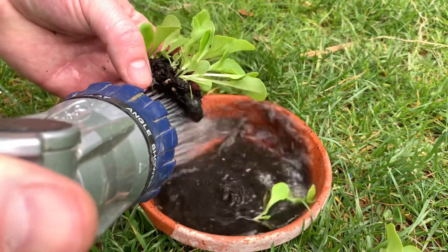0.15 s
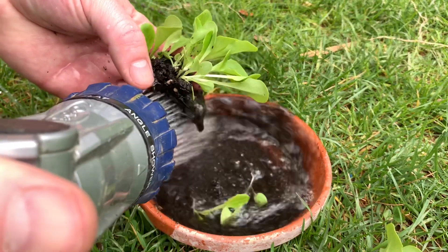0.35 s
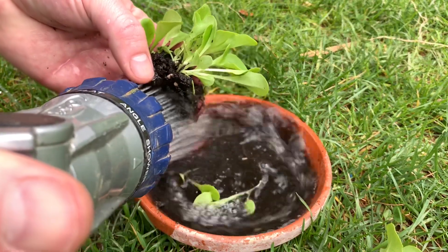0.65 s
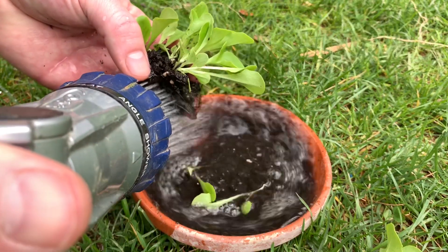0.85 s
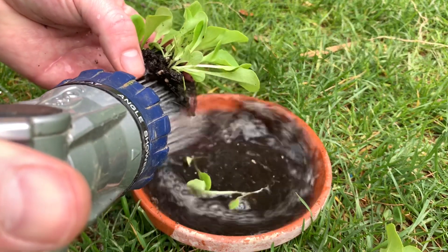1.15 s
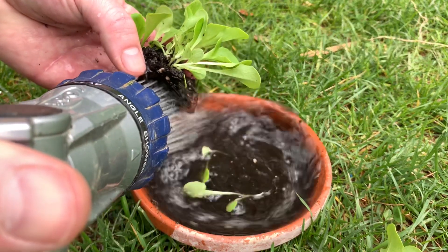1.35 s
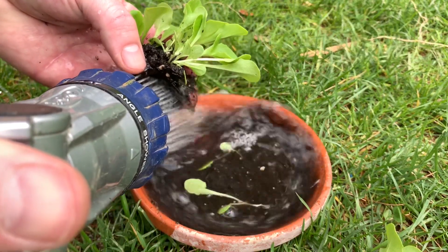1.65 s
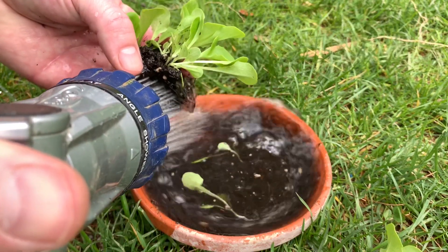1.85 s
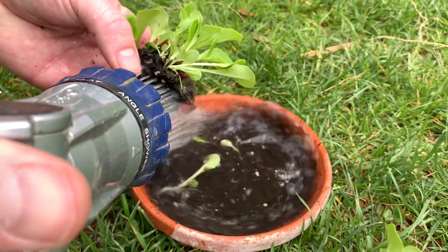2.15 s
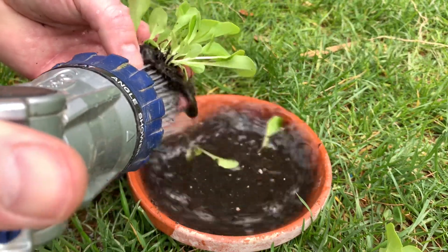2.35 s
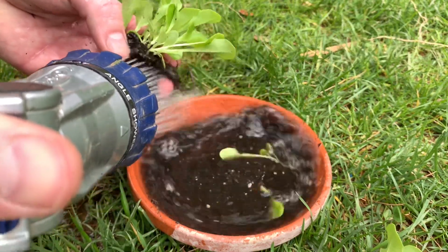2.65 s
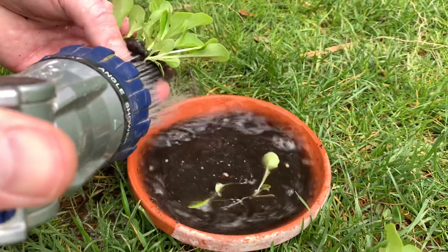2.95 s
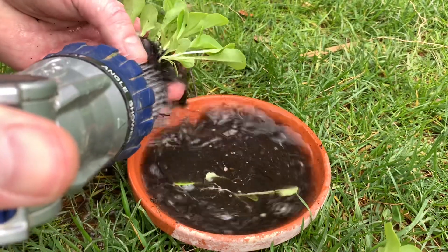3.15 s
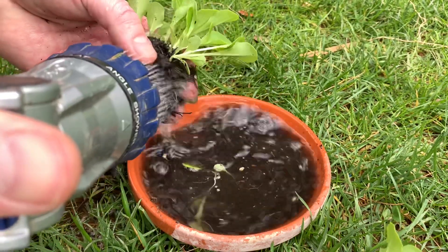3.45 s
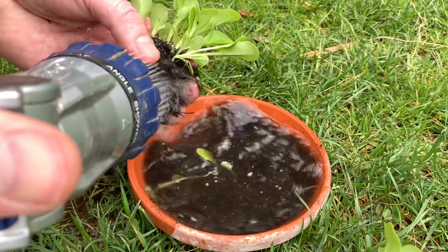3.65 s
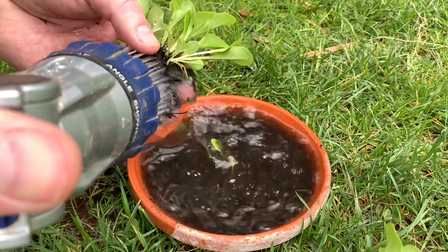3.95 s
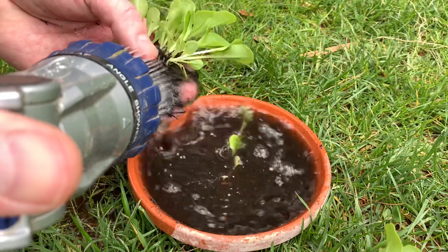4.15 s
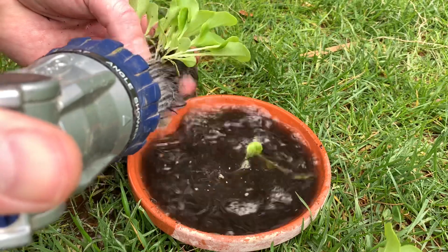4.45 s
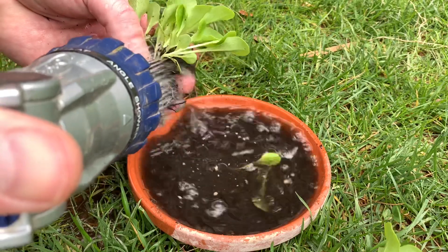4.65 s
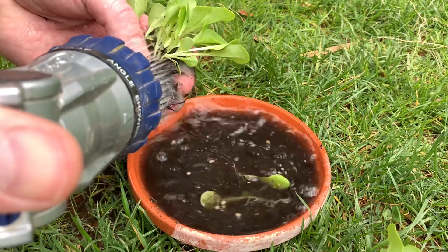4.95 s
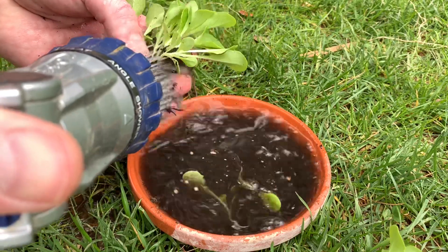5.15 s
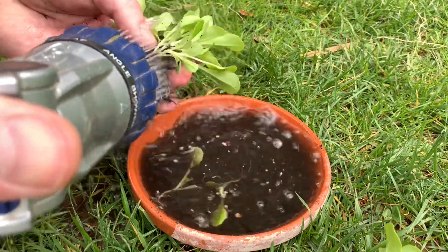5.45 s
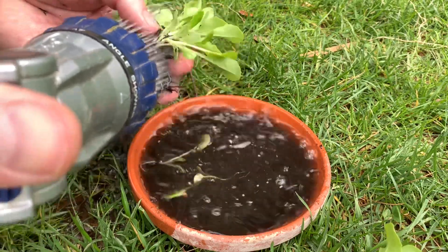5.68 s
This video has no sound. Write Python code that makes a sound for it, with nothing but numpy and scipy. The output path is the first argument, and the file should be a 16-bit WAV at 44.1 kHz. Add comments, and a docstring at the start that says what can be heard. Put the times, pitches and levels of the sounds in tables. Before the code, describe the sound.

A hose nozzle sprays with a bright steady hiss, water pattering into a shallow dish while wind buffets the microphone.

```python
"""A bright hiss comes first: fine jets break up at a hose nozzle close to two microphone ports.
The spray strikes plant roots above a shallow dish on a lawn; its impacts excite resonances,
heard as patter and splashes, and trap small bubbles that ring in the water.
Eddies of wind rumble and thump at the ports, and a far motor hums for the first 2.5 s or so."""
import sys
import numpy as np
from scipy import signal
from scipy.fft import rfft, irfft, next_fast_len
from scipy.io import wavfile

SR = 44100
rng = np.random.default_rng(int(sys.argv[2]) if len(sys.argv) > 2 else 0)


def inscribe(sig):
    """Save sig as 16-bit PCM at rate SR to the path in sys.argv[1].

    A 1-D sig is mono; a 2-D sig holds one channel per row.
    Samples are clipped to [-1, 1] before scaling.
    """
    pcm = np.round(np.clip(np.atleast_2d(sig).T, -1, 1) * 32767)
    wavfile.write(sys.argv[1], SR, pcm.astype(np.int16))


N = 256291
FFT_SIZE = next_fast_len(N)
HZ = np.maximum(np.fft.rfftfreq(FFT_SIZE, 1 / SR), 1.)

# Strength of the spray. Each row: time in seconds, hiss in dB, lower-hiss boost in dB, patter in dB.
SPRAY_LEVELS = [(0, -26, 3, -32.5), (.4, -24.5, 1.5, -32.5), (1.1, -25, 0, -34), (1.8, -26, 2, -33),
                (2.6, -25.5, 2, -34), (3.0, -26, -1.5, -34.5), (3.2, -25, 0.5, -35),
                (3.4, -24.5, -1, -35.5), (3.8, -24.5, -0.5, -34.5), (4.5, -25, -1, -35),
                (5.1, -24.5, 0, -33.5), (5.4, -25, 0.5, -34), (5.81, -24.5, -2.5, -33)]
# Aim of the nozzle. Each row: time in seconds, aim from 0 (across the dish) to 1 (into the roots).
NOZZLE_AIM = [(0, 0.054), (1.2, 0.053), (2.5, 0.34), (3.5, 0.6), (4.5, 0.62), (5.81, 1)]
# Broad spectrum of the hiss. Each row: frequency in Hz, relative spectral density in dB.
JET_SPECTRUM = [(3500, -40), (5500, -19.5), (6300, -11), (7000, -5), (8000, -4), (9500, -5.5), (11500, -10),
                (13000, -6.5), (13500, -6.5), (14200, -8.5), (14600, -14), (15100, -16), (16000, -9)]
# Jet resonances and hollows. Each row: centre in Hz, width in Hz, gains in dB at aim 0, 0.5 and 1.
JET_RESONANCES = [(5600, 560, -3, 0, 0), (6540, 350, 4.5, -2.5, -5.5), (6840, 270, 5, 3.5, 6),
                  (7000, 250, -9, 0, -6), (7710, 520, 5, 4.5, 4.5), (8220, 200, -4.5, -2, -2),
                  (8510, 360, 6, 4, 3), (9100, 400, 3.5, 0.2, 1.5), (10140, 450, 4, 2.5, 4.5),
                  (10500, 290, 2.5, 3, -2), (10700, 400, 0, 2, 4), (11300, 830, -3, -1, -1),
                  (12250, 500, 5, 4.5, 4), (12700, 450, .5, 1.5, 3), (13400, 400, 1, -1.5, -6),
                  (15500, 400, 4, 4, 2.5)]
# Stereo image of the hiss: bands alternately centred and wide.
# Each row: frequency in Hz, left-right likeness, phase gap in cycles.
HISS_STEREO_IMAGE = [(5350, 0.22, -1.34), (6200, 0.5, -0.68), (7090, 0.99, -0.536), (8190, 0.71, -0.24),
                     (8670, 1, -0.13), (9050, 1, -.02), (9600, 1, .02), (9900, 1, .15), (10600, 1, .27),
                     (10950, 1, .4), (11150, 1, .49), (11800, 1, .51), (12050, 1, .62), (12300, 1, .69),
                     (13000, 1, .84), (13300, 1, .98), (14650, 1, 1.02), (15000, .95, 1.12),
                     (15300, 0.88, 1.35), (15800, 0.89, 1.55)]
# Broad spectrum of the patter. Each row: frequency in Hz, relative spectral density in dB.
PATTER_SPECTRUM = [(300, -13.5), (600, -17.5), (1000, -16), (1500, -12), (2100, -4), (3200, -2.5),
                   (4100, -4.5), (4500, -5.5), (6000, -5.5), (8000, -40)]
# Ringing of dish and roots. Each row: centre in Hz, width in Hz, gains in dB at aim 0, 0.5 and 1.
DISH_RESONANCES = [(630, 150, 0.5, 2, -0.5), (1020, 210, 0, 2, 4.5), (1813, 150, 8, 4.5, -1.5),
                   (2170, 310, 4.5, 0, -3), (2430, 220, 6.5, 8.5, 8), (2730, 165, 4.5, 6.5, 9),
                   (3040, 130, 3, 2.5, 5.5), (3600, 360, 3, -6, 6), (3990, 300, 3, 1, 3),
                   (4330, 250, .6, 0.5, -1), (5380, 260, -1, -1, -7), (5940, 250, 0, 3, 2)]
# Stereo image of the patter. Each row: frequency in Hz, left-right likeness, left minus right in dB,
# phase gap in cycles.
PATTER_STEREO_IMAGE = [(300, 0.76, -0.5, -0.24), (700, 0.54, 0.5, -0.25), (1330, 0.45, 5.5, -0.33),
                       (1854, 0.56, 5, -0.456), (2060, 1, -2.5, -0.546), (2520, 0.79, 1, -0.32),
                       (2564, 0.5, -4, -0.51), (2860, 0.53, 5.5, -0.58), (3045, 0.16, 2.5, -0.64),
                       (3110, 1, -3, -0.46), (4350, 0.3, -2, -0.68), (4900, 0.51, -2, -1.2),
                       (5740, 0.29, -6, -0.38), (5900, 0.32, -2, -0.99)]
# Water sloshing in the dish. Each row: time in seconds, boost of the lower patter in dB.
SLOSH_BOOST = [(0, 0), (.5, 2.5), (.85, 0), (1.2, 2), (1.9, -0.5), (2.6, -1), (3.2, -1), (3.6, 1.5),
               (4.1, 0.5), (4.6, 1), (5.3, 1.5), (5.81, 0.5)]
# Wind on the ports. Each row: time in seconds, rumble in dB, brighter edge in dB.
WIND_LEVELS = [(0.0, -47.5, -52), (0.53, -43, -51.5), (0.69, -39.5, -52.5), (0.97, -39.5, -51),
               (1.12, -43, -53), (1.33, -44.5, -54), (1.6, -42, -54), (1.79, -39.5, -48),
               (1.96, -40, -45.5), (2.02, -43, -52), (2.1, -42, -40), (2.22, -34, -48), (2.36, -38, -52),
               (2.52, -42, -56), (2.61, -32, -41), (2.77, -37, -43), (3.06, -38.5, -50), (3.19, -44, -46.5),
               (3.48, -40.5, -52), (3.61, -35, -46.5), (3.75, -40, -44.5), (3.9, -36.5, -47.5),
               (4.13, -40.5, -48.5), (4.43, -36.5, -44.5), (4.76, -35.5, -53), (4.92, -36, -57),
               (5.15, -34.5, -54.5), (5.37, -39.5, -47), (5.6, -36, -48.5), (5.81, -36, -50)]
# Spectra of the two wind noises. Each row: frequency in Hz, relative spectral density in dB.
RUMBLE_SPECTRUM = [(15, -44), (28, -26), (55, 1), (100, 1.5), (150, -9.5), (220, -18.5), (350, -56.5)]
EDGE_SPECTRUM = [(90, -6.5), (160, -5), (250, -8.5), (400, -20), (600, -25), (900, -92)]
# Strength of the motor hum. Each row: time in seconds, level in dB.
MOTOR_LEVELS = [(0, -49), (.5, -49.5), (.95, -47), (1.3, -55.5), (2.2, -49), (2.6, -86), (5.81, -90)]
# Harmonics of the motor. Each row: frequency in Hz, relative level in dB.
MOTOR_HARMONICS = [(100, 6.5), (200, -2.5), (300, -13)]
# Splashes off the roots. Each row: midpoint in seconds, length in seconds, pitch in Hz, level in dB.
SPLASH_BURSTS = [(0.095, .05, 5250, -39), (0.43, 0.085, 1610, -49), (0.508, .07, 1050, -52),
                 (0.551, 0.023, 1980, -41), (0.589, 0.06, 1270, -51), (2.028, .05, 2450, -41),
                 (2.1, .12, 3370, -45), (2.72, 0.1, 2180, -62), (2.973, 0.055, 2270, -42.5),
                 (3.65, .2, 6470, -46), (3.754, 0.071, 4140, -45), (4.385, 0.043, 4930, -39.5),
                 (4.87, .12, 1160, -61), (5.201, 0.25, 1030, -57), (5.306, 0.091, 1930, -57),
                 (5.335, 0.04, 1290, -47), (5.73, .06, 1330, -61)]
# Strong eddies. Each row: start in seconds, push gain in dB, base pitch in Hz before it sags, left minus
# right in dB, flap level in dB, cycles gained in the quick fall, decay time in seconds.
STRONG_EDDIES = [(0.993, -25.5, 85, 0, -47, 1.06, .03), (1.034, -26, 129, 0, -34, 1.6, .022),
                 (1.069, -26, 90, 1, -38.5, 1.48, 0.03), (1.106, -19, 126, 2, -37, 1.33, 0.021),
                 (1.119, -17.5, 101, 1.5, -34.5, 1.08, 0.02), (1.15, -26.5, 65, 0, -55, 0.26, 0.029),
                 (2.039, -18.5, 71.4, 2.5, -30, 2, .03), (2.099, -27, 79.6, -2, -36, 1.4, 0.029),
                 (2.139, -29, 129, -1, -37, 1.2, 0.037), (2.161, -25, 95, -3, -43, .4, .026),
                 (2.21, -25, 100, 0, -50, .3, 0.027), (2.262, -26, 100, -2, -47, 1.1, .026),
                 (2.308, -28.5, 110, 0, -49, 1.2, .024), (2.542, -35, 90, 10, -50, 0.33, 0.028),
                 (2.567, -22.5, 143, 5, -47, 0.48, 0.023), (2.609, -20.5, 163, -4, -43, 0.75, 0.023),
                 (2.634, -22.5, 170, 12, -45, 0.72, .026), (2.653, -18.5, 170, -3, -36, 0.62, 0.017),
                 (2.691, -25, 110, 5, -39, 0.55, .026), (2.727, -18.5, 126, 3.5, -35, .3, 0.019),
                 (2.765, -31, 110, 2, -49, 0.34, 0.016), (2.809, -19.5, 120, -3, -42, .1, 0.021),
                 (2.851, -32, 110, 0, -49, .4, 0.02), (2.874, -26.5, 116, 0, -56, 0.36, 0.051),
                 (2.941, -15.5, 117, 0, -56, 0.11, 0.015), (2.983, -30, 100, -2, -53, .4, 0.037),
                 (3.464, -25.5, 76, 5, -54, 1.3, .026), (3.61, -23, 70, 5, -52, 1.25, 0.03),
                 (3.684, -29, 110, -2, -43, .8, 0.022), (3.794, -30, 53.8, -4, -38, 1.3, 0.028),
                 (3.846, -26, 110, 0, -44, .6, .026), (3.928, -41, 94.2, 3, -41, 1.3, 0.023),
                 (4.047, -27.5, 110, 2, -48, 0.65, .035), (4.27, -28.5, 110, 4, -51, 1.37, 0.029),
                 (4.304, -26, 61.6, 0, -53, 1.8, 0.034), (4.358, -27, 70, -2, -46, .5, .04),
                 (4.419, -28, 105, 2, -44, 0.46, 0.02), (4.748, -24, 100, 0, -39, 0.45, .025),
                 (4.766, -19.5, 140, 1.5, -28, 1.4, 0.022), (4.792, -28, 90, 2, -33.5, 1.35, 0.026),
                 (4.825, -30, 100, 1, -40, 0.45, 0.03), (5.274, -22, 59.2, 1, -59, 1.46, 0.017),
                 (5.544, -25, 98.5, 2, -38, 1.2, 0.034)]

LOWER_HISS_TOP_HZ, SLOSH_TOP_HZ = 8200, 1950
PATTER_MAX_LIKENESS = (0.75, 1, 1)   # at aim 0, 0.5 and 1
SURGE_DB, SURGE_HZ = 0.42, 16   # the patter comes in uneven surges
DIP_HISS_DB, DIP_PATTER_DB = -13, -5.5   # scaled by the dip's envelope


def from_db(db):
    """Amplitude grows tenfold for every 20 dB."""
    return 10 ** (np.asarray(db) / 20)


def unit_rms(x):
    """Normalisation to a mean power of 1."""
    return x / np.sqrt(np.mean(x ** 2) + 1e-20)


def over_time(rows):
    """Linear interpolation of each column to every sample."""
    seconds, *columns = np.transpose(rows)
    return [np.interp(np.arange(N) / SR, seconds, column) for column in columns]


def over_frequency(rows):
    """Interpolation of each column on a logarithmic frequency axis."""
    hz, *columns = np.transpose(rows)
    return [np.interp(np.log(HZ), np.log(hz), column) for column in columns]


def drift(corner_hz):
    """Low-pass filtering turns white noise into a slow fluctuation of unit variance."""
    step = 40   # samples between control points
    pole = np.exp(-2 * np.pi * corner_hz * step / SR)
    noise = rng.standard_normal(N // step + 2002)
    slow = signal.lfilter([1], [1, -2 * pole, pole * pole], noise)[2000:]
    return np.interp(np.arange(N) / step, np.arange(len(slow)), unit_rms(slow - slow.mean()))


def flicker(streams, edges_hz, boost_db, boost_below_hz, shared_db, own_db, own_hz):
    """Amplitude modulation: bands waver together and apart, the lower ones boosted. Returns spectra."""
    spectra, together, out = rfft(streams, FFT_SIZE), drift(5.8), 0
    for low, high in zip(edges_hz, edges_hz[1:]):
        band = irfft(spectra * ((HZ >= low) & (HZ < high)), FFT_SIZE)[:, :N]
        waver_db = shared_db * together + own_db * (drift(own_hz) + .6 * drift(.8))
        out = out + band * from_db(waver_db + boost_db * (low < boost_below_hz))
    return rfft(out, FFT_SIZE)


def stereo_image(spectra, likeness, gap_cycles, balance_db=0):
    """Partial coherence: left and right share one stream with a phase gap, and each adds its own."""
    side = np.array([[-.5], [.5]])
    shared = np.sqrt(likeness) * spectra[0] * np.exp(2j * np.pi * gap_cycles * side)
    return (shared + np.sqrt(1 - likeness) * spectra[1:]) * from_db(-balance_db * side)


def coloured(spectra, broad_spectrum, resonances=(), aim_index=0):
    """Source and filter: a broad spectrum with bell-shaped resonances shapes a signal of unit rms."""
    peaks_db = sum(gains_db[aim_index] * np.exp(-2 * ((HZ - centre) / width) ** 2)
                   for centre, width, *gains_db in resonances)
    gain = from_db(over_frequency(broad_spectrum)[0] + peaks_db)
    return unit_rms(irfft(spectra * gain, FFT_SIZE)[:, :N])


def blend_by_aim(aim, sounds):
    """Linear cross-fade between the sounds at aim 0, 0.5 and 1."""
    return sum(np.maximum(1 - np.abs(2 * aim - k), 0) * sound for k, sound in enumerate(sounds))


def jet_hiss(aim, lower_db):
    """Jet break-up radiates broadband noise; its bands sound alternately centred and wide."""
    edges_hz = LOWER_HISS_TOP_HZ * 1.19 ** np.arange(-5, 5)
    noise = rng.standard_normal((3, N))
    spectra = flicker(noise, edges_hz, lower_db, LOWER_HISS_TOP_HZ, shared_db=.25, own_db=.6, own_hz=20)
    heard = stereo_image(spectra, *over_frequency(HISS_STEREO_IMAGE))
    return blend_by_aim(aim, [coloured(heard, JET_SPECTRUM, JET_RESONANCES, k) for k in range(3)])


def drop_impacts(per_s, spread_db):
    """Shot noise: random impulses of uneven size, in one shared stream and one for each side."""
    sizes = from_db(spread_db * np.minimum(rng.exponential(1, (3, N)), 5))
    signs = rng.choice([-1, 1], (3, N))
    return unit_rms(sizes * signs * (rng.random((3, N)) < per_s / SR))


def patter(aim):
    """Impact excitation: thousands of drops a second set roots, water and rim ringing."""
    edges_hz = SLOSH_TOP_HZ * 1.3 ** np.arange(-8, 7)
    impacts, slosh_db = drop_impacts(per_s=6000, spread_db=3.5), over_time(SLOSH_BOOST)[0]
    spectra = flicker(impacts, edges_hz, slosh_db, SLOSH_TOP_HZ, shared_db=.15, own_db=1.5, own_hz=12)
    likeness, balance_db, gap_cycles = over_frequency(PATTER_STEREO_IMAGE)
    sounds = []
    for k, ceiling in enumerate(PATTER_MAX_LIKENESS):
        heard = stereo_image(spectra, np.minimum(likeness, ceiling), gap_cycles, balance_db)
        sounds.append(coloured(heard, PATTER_SPECTRUM, DISH_RESONANCES, k))
    return blend_by_aim(aim, sounds)


def bubbles(per_s=120, level_db=-64, decay_cycles=20):
    """Trapped air rings as a damped oscillator whose pitch rises as it nears the surface."""
    out, t = np.zeros((2, N + 2000)), np.arange(2000) / SR
    for when, smallness, faintness, place in rng.random((int(per_s * N / SR), 4)):
        hz, start = 800 * 4.55 ** smallness, int(when * N)
        tone = np.exp(-t * hz / decay_cycles) * np.sin(2 * np.pi * hz * t * (1 + 0.00366 * hz * t))
        strength_db = -3.0 * np.log(faintness + 0.054)
        pan_db = 8.4 * (place - 1.5) * np.array([[1], [-1]])   # always to the right
        out[:, start:start + len(t)] += from_db(strength_db + pan_db) * tone
    return from_db(level_db) * unit_rms(out[:, :N])


def wind():
    """Turbulence: passing eddies make lumpy low noise, partly coherent between the ports."""
    rumble_db, edge_db = over_time(WIND_LEVELS)
    lumps, eddies = drift(24), rfft(rng.standard_normal((3, N)), FFT_SIZE)
    rumble = from_db(rumble_db + 2 * lumps) * coloured(eddies, RUMBLE_SPECTRUM)
    edge = from_db(edge_db + 3 * lumps) * coloured(eddies, EDGE_SPECTRUM)
    pressure = sum(np.sqrt(likeness) * streams[0] + np.sqrt(1 - likeness) * streams[1:]
                   for streams, likeness in ((rumble, .35), (edge, .65)))
    # The lows of each lump come late: a group delay of 0.887 periods from 30 to 900 Hz.
    dispersion = np.exp(2j * np.pi * 0.887 * np.log(900 / np.clip(HZ, 30, 900)))
    return irfft(rfft(pressure, FFT_SIZE) * dispersion, FFT_SIZE)[:, :N]


def motor_hum():
    """Periodic vibration gives a harmonic series, here wavering slightly in pitch."""
    phase_per_hz = 2 * np.pi * np.cumsum(1 + 0.01256 * drift(3.3)) / SR
    harmonics = sum(from_db(db) * np.sin(hz * phase_per_hz) for hz, db in MOTOR_HARMONICS)
    return from_db(over_time(MOTOR_LEVELS)[0]) * harmonics


def splashes(relative_bandwidth=0.17):
    """Resonance gathers drops thrown off the roots into a narrow band that swells and fades."""
    out, size = np.zeros((2, N)), 16384
    t = (np.arange(size) - size / 2) / SR
    for middle_s, length_s, hz, db in SPLASH_BURSTS:
        radius, angle = np.exp(-np.pi * relative_bandwidth * hz / SR), 2 * np.pi * hz / SR
        spray = rng.standard_normal((2, size))
        spray *= from_db(2.5 * np.minimum(rng.exponential(1, (2, size)), 4))   # uneven drops
        for _ in range(2):
            spray = signal.lfilter([1, 0, -1], [1, -2 * radius * np.cos(angle), radius ** 2], spray)
        burst = from_db(db) * np.exp(-(2 * t / length_s) ** 2) * unit_rms(spray)
        samples = int(middle_s * SR) - size // 2 + np.arange(size)
        inside = (samples >= 0) & (samples < N)
        out[:, samples[inside]] += burst[:, inside]
    return out


def buffets(flap_rise_s=.0045, push_rise_s=0.0063, quick_fall_s=0.0073, sag_s=0.062):
    """A strong eddy is a pressure transient at the ports: a quick flap, then a push of falling pitch."""
    out, t = np.zeros((2, N + 4000)), np.arange(4000) / SR
    flap_cycles = 230 * t + 1.43 * (1 - np.exp(-t / 0.0063))
    flap = t / flap_rise_s * np.exp(1 - t / flap_rise_s) * np.sin(2 * np.pi * flap_cycles)
    sagging_time = sag_s * (1 - np.exp(-t / sag_s))
    for start_s, push_db, hz, balance_db, flap_db, extra_cycles, decay_s in STRONG_EDDIES:
        swell = (1 - np.exp(-(t / push_rise_s) ** 2)) * np.exp(-(t / decay_s) ** 1.86)
        cycles = hz * sagging_time + extra_cycles * (1 - np.exp(-t / quick_fall_s))
        push = swell * np.sin(2 * np.pi * cycles)
        start, pan = int(start_s * SR), from_db(balance_db * np.array([[.5], [-.5]]))
        out[:, start:start + len(t)] += pan * (from_db(push_db) * push + from_db(flap_db) * flap)
    return out[:, :N]


def brief_dip(start_s=1.162, fall_s=0.033, recovery_s=0.14):
    """Envelope of a dip in the lower hiss and the patter: quick onset, exponential recovery."""
    elapsed = np.maximum(np.arange(N) / SR - start_s, 0)
    return (1 - np.exp(-(elapsed / fall_s) ** 2)) * np.exp(-elapsed / recovery_s)


def scene():
    """Superposition: the sounds of water, wind and motor add in each channel."""
    hiss_db, lower_db, patter_db = over_time(SPRAY_LEVELS)
    aim, dip = over_time(NOZZLE_AIM)[0], brief_dip()
    hiss = from_db(hiss_db) * jet_hiss(aim, lower_db + DIP_HISS_DB * dip)
    drops = from_db(patter_db + DIP_PATTER_DB * dip + SURGE_DB * drift(SURGE_HZ)) * patter(aim)
    return hiss + drops + bubbles() + splashes() + wind() + buffets() + motor_hum()


def record(dry, cutoff_hz=15750):
    """An elliptic low-pass filter cuts the highest treble steeply."""
    return signal.sosfilt(signal.ellip(14, .5, 70, cutoff_hz, fs=SR, output="sos"), dry)


dry = scene()
out = record(dry)
inscribe(out)
```